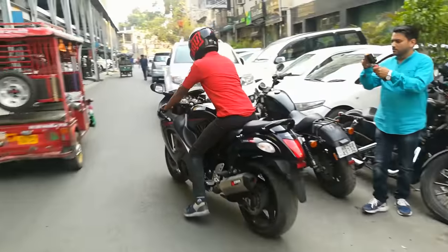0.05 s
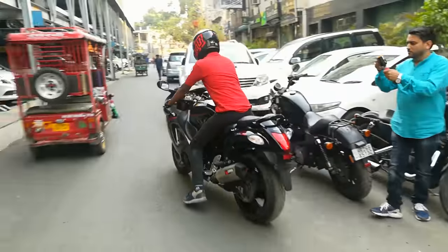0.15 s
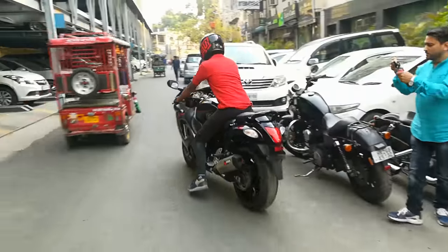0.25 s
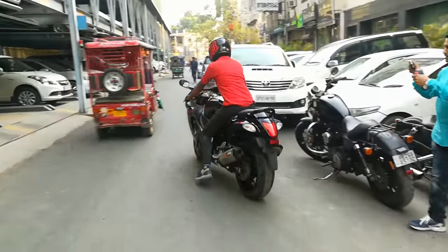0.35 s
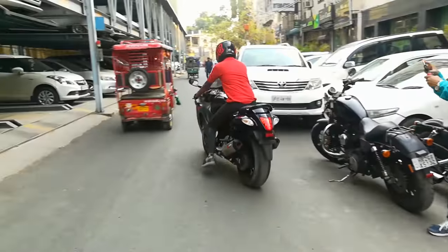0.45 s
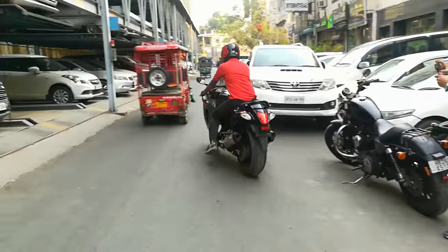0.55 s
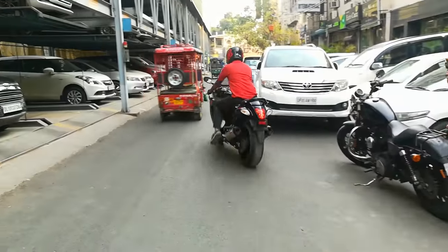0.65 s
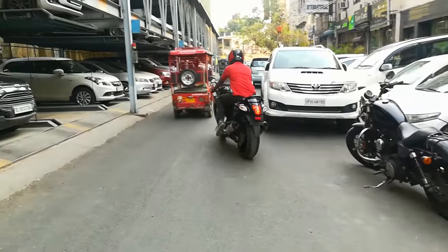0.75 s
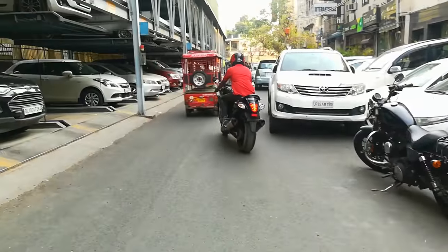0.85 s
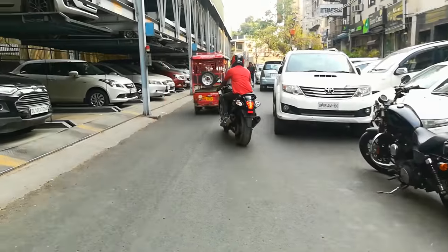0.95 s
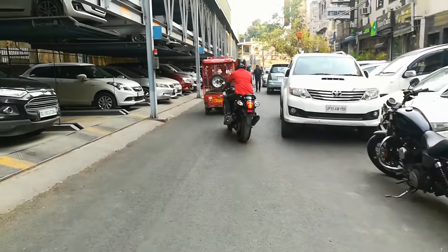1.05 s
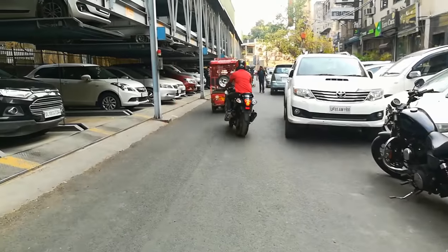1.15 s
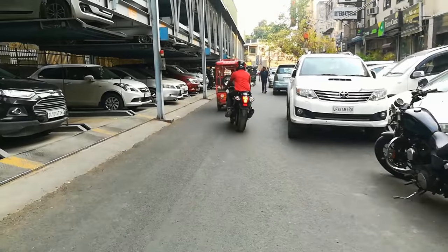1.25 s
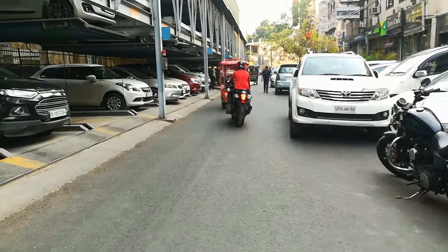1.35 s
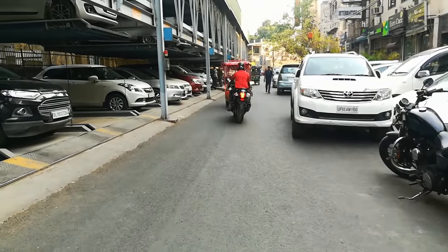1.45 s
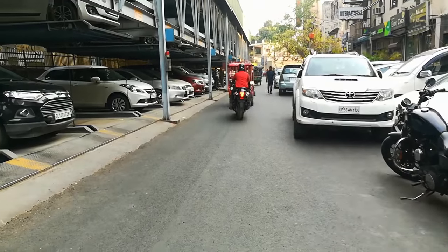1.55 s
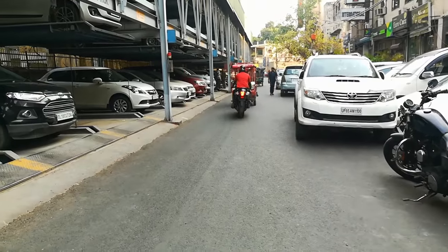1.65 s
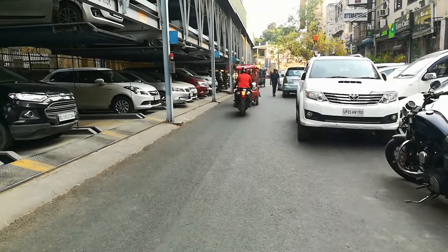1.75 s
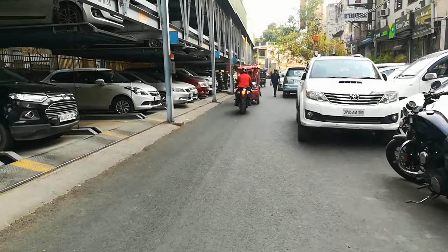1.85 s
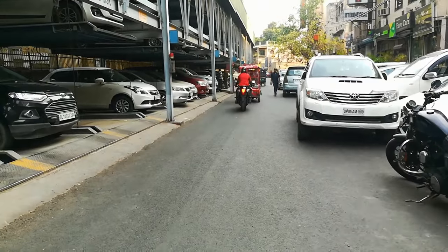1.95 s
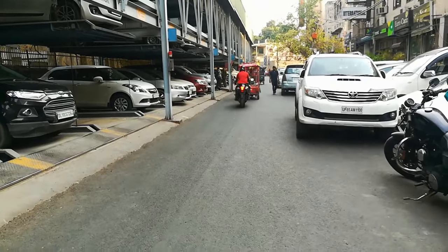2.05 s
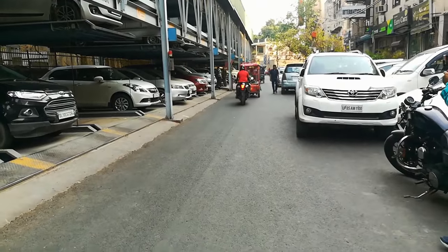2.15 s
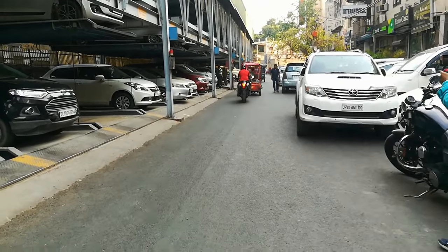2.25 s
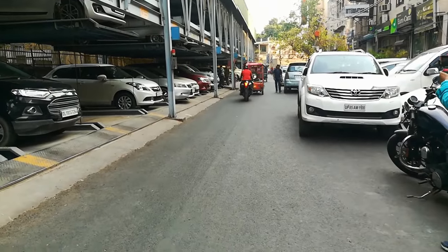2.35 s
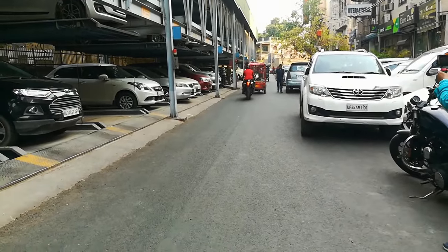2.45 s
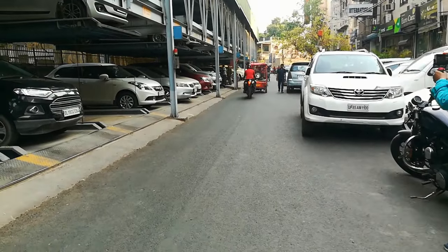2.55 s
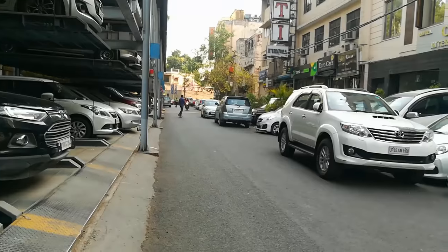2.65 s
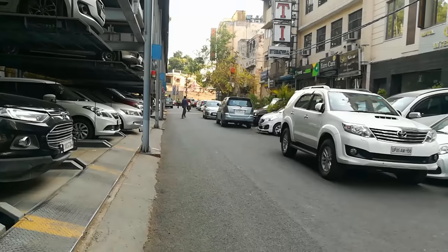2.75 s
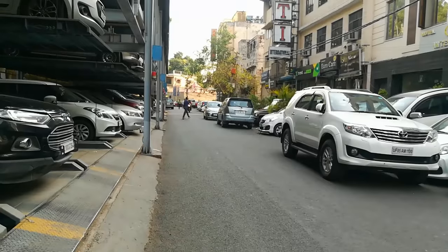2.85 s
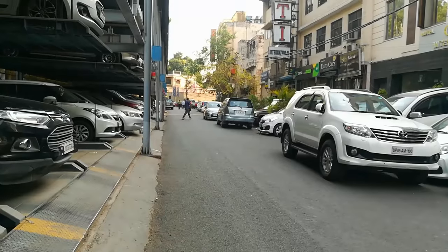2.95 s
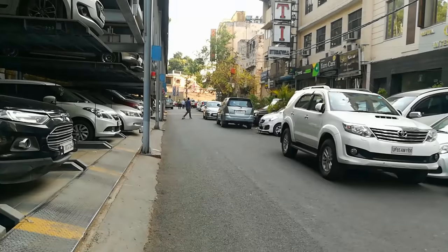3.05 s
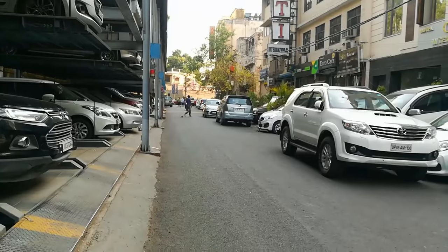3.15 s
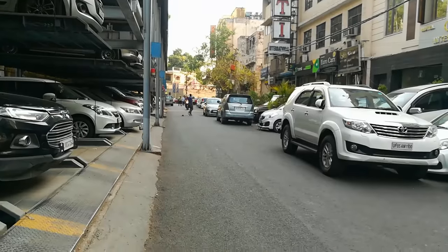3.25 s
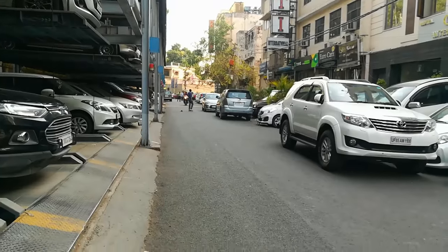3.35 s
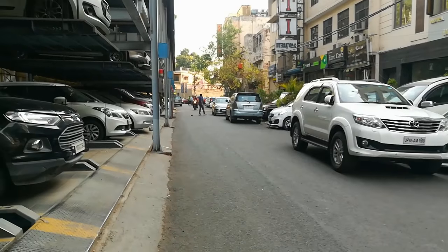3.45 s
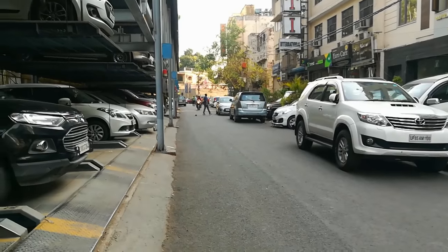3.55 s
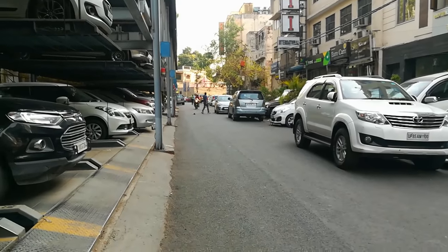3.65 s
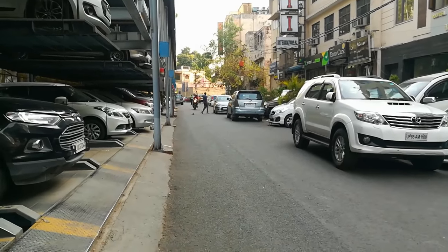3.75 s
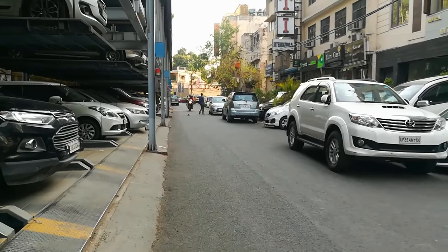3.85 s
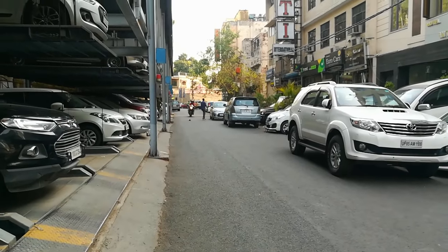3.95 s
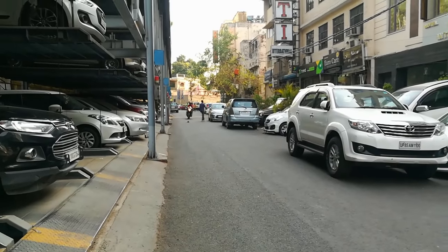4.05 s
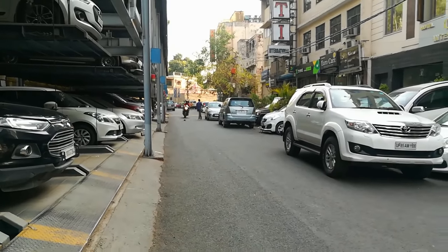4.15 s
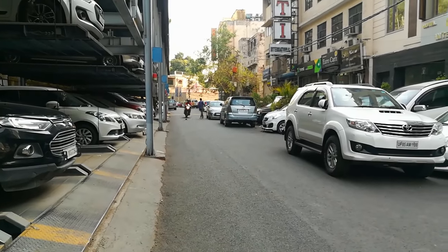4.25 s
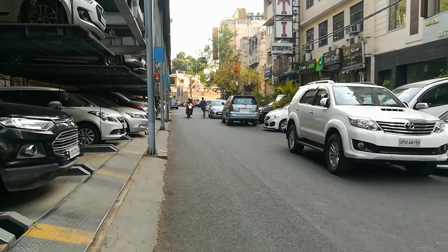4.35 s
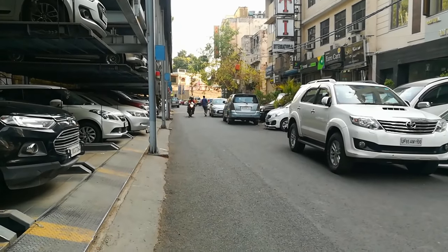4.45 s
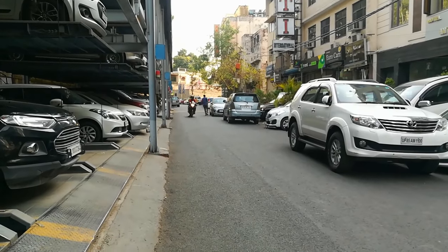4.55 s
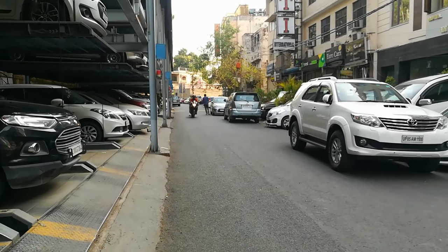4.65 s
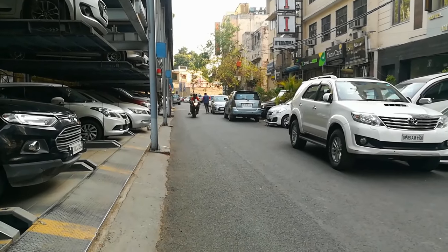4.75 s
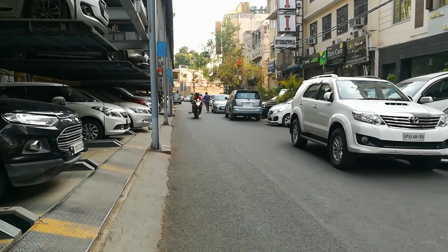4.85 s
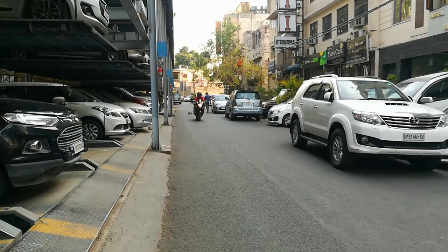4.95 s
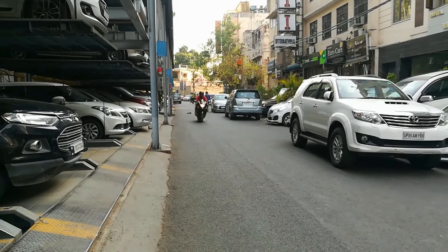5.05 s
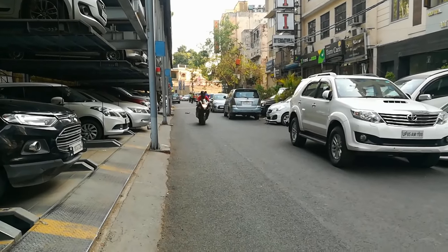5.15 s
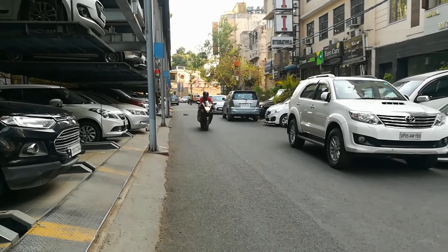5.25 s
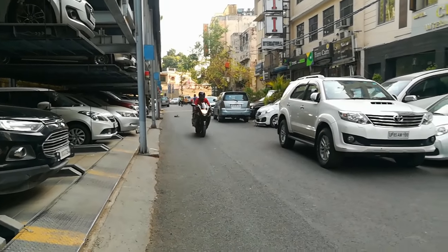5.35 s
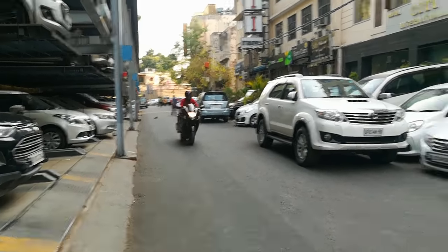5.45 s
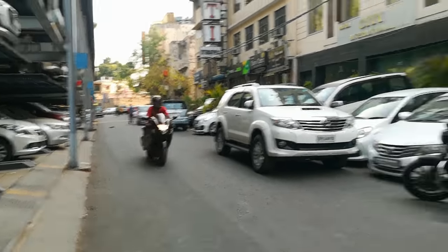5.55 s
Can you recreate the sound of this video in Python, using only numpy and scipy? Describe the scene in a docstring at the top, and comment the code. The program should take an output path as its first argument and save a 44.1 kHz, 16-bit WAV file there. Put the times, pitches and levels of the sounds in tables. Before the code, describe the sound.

A big motorcycle pulls gently away down a street, burbling and popping off throttle, then abruptly another pass accelerates hard back towards the listener.

```python
"""A motorcycle leaves down a narrow street and rides back

From 3.7 m off, a big four-cylinder machine pulls gently away and burbles and pops on a closed throttle.
The scene changes abruptly: it accelerates back from 46 m, shifts up once and shuts off some 15 m away.
Exhaust orders are sines locked to the firing phase; delayed street reflections make them swell and fade.
Filtered noise makes clatter, hiss, intake, ringing bands, scuffs and street; wavering sines make gear whine.
"""
import sys
import numpy as np
from scipy import signal
from scipy.fft import rfft, irfft, next_fast_len
from scipy.io import wavfile
from scipy.ndimage import uniform_filter1d, map_coordinates

SR = 44100
rng = np.random.default_rng(int(sys.argv[2]) if len(sys.argv) > 2 else 0)


def put_to_file(sound):
    """Save the sound as 16-bit audio at rate SR, in the file named by the first command-line argument."""
    columns = np.atleast_2d(sound).T  # one column per channel
    safe = np.clip(columns, -1, 1)
    whole_steps = np.round(safe * 32767)
    wavfile.write(sys.argv[1], SR, whole_steps.astype(np.int16))


N = 247842
T = np.arange(N) / SR  # time [s]
CUT_S = 2.557  # the ride away gives way to the ride back


def undb(db):
    """Decibels to gain."""
    return 10 ** (np.asarray(db) / 20)


def unit(x):
    """Scale to rms 1."""
    return x / np.sqrt(np.mean(x ** 2))


def curves(table):
    """Each column of a table as a line through time."""
    s, *columns = np.transpose(table)
    return [np.interp(T, s, c) for c in columns]


def gain_at(points, hz):
    """Gain of a spectrum at the given frequencies."""
    f, db = np.transpose(points)
    return undb(np.interp(np.log(hz + 1), np.log(f), db))


def colour(x, points):
    """Causal filter with the given spectrum, by way of the cepstrum."""
    size = 2 * next_fast_len(N)
    bins_hz = np.arange(size // 2 + 1) * SR / size
    cepstrum = irfft(np.log(gain_at(points, bins_hz)))
    # folding the cepstrum forward in time gives minimum phase
    cepstrum[1:size // 2] *= 2
    cepstrum[size // 2 + 1:] = 0
    response = np.exp(rfft(cepstrum))
    return irfft(rfft(x, size) * response)[..., :N]


def band(x, lo_hz, hi_hz, order=2):
    """Band-pass."""
    edges = [lo_hz, min(hi_hz, SR / 2 - 1)]
    return signal.sosfilt(signal.butter(order, edges, "band", fs=SR, output="sos"), x)


def walk(rate):
    """Random levels held 1 / rate s and smoothed twice; rms 1."""
    k = int(SR / rate)
    held = np.repeat(rng.standard_normal(N // k + 1), k)
    smooth = uniform_filter1d(uniform_filter1d(held, k), k)
    return unit(smooth[:N])


def air(shared):
    """White noise at two microphone ports, with a part common to both."""
    return unit(rng.standard_normal((2, N)) + shared * rng.standard_normal(N))


def resonances(modes):
    """Noise narrowed to a few bands, each at its own level."""
    return sum(undb(db) * unit(band(air(0.91), f - w / 2, f + w / 2, order=1)) for f, w, db in modes)


def levels(laws, *controls):
    """Each layer's level in dB: a base plus its own response to each control."""
    return {name: db + sum(slope * c for slope, c in zip(slopes, controls))
            for name, (db, *slopes) in laws.items()}


# Air of the street during the ride away: (frequency [Hz], relative level [dB])
STREET_SPECTRUM = [(240, -51), (400, -7), (520, -14), (653, -9.5), (1030, -10), (1170, -22), (1280, -7),
                   (1680, -16), (2880, -13.5), (3560, -22), (9930, -30), (15500, -38)]


def street_air():
    """Quiet street background: steady coloured noise with a slight waver."""
    return unit(colour(air(0.21), STREET_SPECTRUM)) * undb(-54.5 + 0.14 * walk(4.706))


# Distant traffic during the ride back: (frequency [Hz], relative level [dB])
TRAFFIC_SPECTRUM = [(25, 14.5), (65, 25.5), (150, 7), (310, 10.5), (430, -14), (530, -16), (950, 0.5),
                    (1350, 2), (1800, -12), (2800, -14), (5500, -14.5), (15000, -26)]


def distant_traffic():
    """Traffic far off: low-heavy noise, largely alike at both ports, slowly wavering."""
    return unit(colour(air(2.8), TRAFFIC_SPECTRUM)) * undb(-39 + 1.25 * walk(6.02))


# Small scuffs near the microphone: (time [s], half-width to 1/e [s], level [dB])
SCUFF_TIMES = [(3.27, 0.017, -55.5), (3.313, 0.0026, -48), (3.33, .018, -53)]
# Their tone: (frequency [Hz], relative level [dB])
SCUFF_SPECTRUM = [(2000, -34), (5000, -2.5), (11000, -4), (15000, -4.5)]


def scuffs():
    """Brief bright rubs close to the microphone: noise under bell-shaped swells."""
    swell = sum(undb(db) * np.exp(-((T - s) / length) ** 2) for s, length, db in SCUFF_TIMES)
    return swell * unit(colour(air(.3), SCUFF_SPECTRUM))


def street_echo(x, t60_s, wet_db):
    """Diffuse return from house fronts and the parking deck, different at each port."""
    t = T[:SR]
    after_gap = t > .012  # s before the first return
    tail = rng.standard_normal((2, SR)) * undb(-60 * t / t60_s) * after_gap
    tail /= np.sqrt(np.sum(tail ** 2, axis=1, keepdims=True))
    wet = signal.fftconvolve(x[None], tail, axes=1)[:, :N]
    # the ports lie close together, so they differ little in the bass
    return x + undb(wet_db) * colour(wet, [(60, -15.5), (170, -15.5), (330, 2.0), (500, 6)])


def mirrored(x, mirrors, since):
    """Late copies cancel and reinforce the direct sound, so a gliding tone swells and fades."""
    def late(ms):
        return map_coordinates(x, [(T - ms / 1000) * SR], order=1, mode="mirror")

    return x + sum(undb(db) * late(ms + drift * since) for ms, drift, db in mirrors)


def machinery(turn, spectrum, clatter_db, hiss_db, throb):
    """Valve gear, chain and tyres: a rush that throbs a little with each firing and flickers."""
    gate = (1 + throb * np.cos(2 * np.pi * turn)) * undb(0.35 * walk(90))
    clatter = unit(band(colour(air(0.32) * gate, spectrum), 457, 3380, order=4))
    hiss = unit(band(colour(air(0.089) * gate, spectrum), 3100, 15400, order=4))
    return clatter * undb(clatter_db + 1.2 * walk(18)) + hiss * undb(hiss_db + 0.39 * walk(15))


def whine(turn, gears, level_db, smear_rate):
    """Meshing gear teeth, smeared by backlash and by reflections on the way to each port."""
    def smeared(angle):
        return walk(smear_rate) * np.cos(angle) + walk(smear_rate) * np.sin(angle)

    out = np.zeros((2, N))
    for multiple, db in gears:
        angle = 2 * np.pi * multiple * turn
        out += undb(db) * np.array([smeared(angle) for _ in range(2)])
    return out * undb(level_db)


# Airbox resonances: (frequency [Hz], width [Hz], level against the intake level [dB])
AIRBOX_MODES = [(803, 69, -8.5), (1403, 87, -8.5), (1770, 270, -5)]


def intake_roar(turn, level_db):
    """Turbulence rings the airbox and gulps with one intake stroke per firing."""
    gulps = 1 + 0.21 * np.cos(2 * np.pi * turn)
    return resonances(AIRBOX_MODES) * gulps * undb(level_db)


# Narrow ringing bands of noise: engine covers, and a high microphone resonance near 10.4 kHz:
# (frequency [Hz], width [Hz], level against the hiss before dulling [dB])
RINGING_MODES = [(3025, 53, -3), (4030, 270, -5), (5449, 360, -11), (10420, 597, -14.5)]


def ringing_bands(near, hiss_db):
    """Engine covers and a high microphone resonance as bands of noise, all dropping near the end."""
    late_drop = np.interp(T, [5.33, 5.46], [1, .4])
    return resonances(RINGING_MODES) * near * late_drop * undb(hiss_db)


def uneven_firings(turn):
    """One pulse per firing, of random size and either sign, for the unevenness of the burns."""
    at = np.flatnonzero(np.diff(np.floor(turn)))
    pulses = np.zeros(N)
    pulses[at] = rng.uniform(-0.79, 1, len(at))
    return pulses


# Pops in the silencer: (time [s], peak level before the common pop gain [dB])
SILENCER_POPS = [(1.774, -37), (1.87, -38), (2.042, -42), (2.075, -40.5), (2.33, -45), (2.367, -40),
                 (2.52, -37)]
# Tone of a pop: (frequency [Hz], relative level [dB])
POP_SPECTRUM = [(30, -18), (90, 26), (200, 21), (350, -4), (480, -26), (1000, -34), (4000, -51)]
# Tone of the burble: (frequency [Hz], relative level [dB])
BURBLE_SPECTRUM = [(20, -52), (45, 1.5), (75, 1.5), (115, 4.5), (170, -9.5), (240, -21.5), (360, -16.5),
                   (520, -49), (1500, -80)]
POP_GAIN_DB = 11.5


def overrun(turn, burble_db):
    """With the throttle shut the cylinders fire raggedly and stray fuel pops in the silencer."""
    ragged_turn = turn + 0.193 * walk(60)
    burble = unit(colour(uneven_firings(ragged_turn), BURBLE_SPECTRUM)) * undb(burble_db)
    kicks = np.zeros(N)
    for s, db in SILENCER_POPS:
        kicks[int(s * SR)] += undb(db)
    ring_peak = np.abs(colour(signal.unit_impulse(N), POP_SPECTRUM)).max()
    return burble + undb(POP_GAIN_DB) * colour(kicks, POP_SPECTRUM) / ring_peak


def exhaust(turn, hz, order_db, spectrum, rasp_db, upper_db, half_db, rough_db, gas, count=9):
    """Low orders, one by one, and the rasp: whole orders from the mean firing, half orders from
    unequal cylinders, and a rumble from uneven burns and gas flow in the silencer."""
    angle = 2 * np.pi * (turn + .006 * walk(45))  # slight jitter of the firing

    def order(k):
        """One multiple of the firing rate; the sharp edge leaves first, the low boom after it."""
        return np.cos(k * angle + np.pi * k ** 2 / 7)

    def line(k):
        """An order at the silencer's gain, wavering on its own."""
        return gain_at(spectrum, k * hz) * undb(1.87 * walk(13)) * order(k)

    boom = [undb(db + 0.6 * k * walk(11)) * np.sqrt(2) * order(k) for k, db in enumerate(order_db, 1)]
    whole = sum(line(k) for k in range(len(order_db) + 1, count + 1))
    halves = sum(line(k + .5) for k in range(1, count - 2))
    flow = rng.standard_normal(N) * (1 + 0.45 * np.cos(angle))
    burns = unit(uneven_firings(turn) / np.sqrt(hz))
    rough = unit(colour(burns + gas * flow, spectrum))
    rasp = undb(upper_db) * whole + undb(half_db) * halves + undb(rough_db) * rough
    return boom, undb(rasp_db) * rasp


# Engine speed riding away: (time [s], firing rate [Hz])
AWAY_FIRING = [(0.0, 73.2), (0.38, 59.47), (0.6, 64.6), (0.97, 61.47), (1.29, 70.64), (1.5, 74.86),
               (1.63, 72.7), (1.72, 66.2), (1.79, 71.43), (2.55, 61.8)]
# Level by layer, before wavering: (at the start with the throttle shut [dB],
# change per halving of distance [dB], added by the throttle [dB])
AWAY_LAYERS = {"first order": (-23, 8.1, 2.3), "second order": (-35.5, 4.35, 12.63),
               "third order": (-43, 1, 10.9), "rasp": (-53.5, 0, 19.1), "clatter": (-51.5, 3.5, 5.7),
               "hiss": (-57, 2.4, 6.54), "gears": (-55, 8.7, 7.5)}
# The silencer heard from behind: (frequency [Hz], relative level [dB])
SILENCER_BEHIND = [(25, -5), (55, -8), (100, -0.5), (160, 7.5), (200, -2), (250, 3.5), (320, -6),
                   (385, -13), (460, -15.5), (540, -31), (900, -36), (2000, -43)]
# House fronts and parked cars mirroring the boom:
# (delay as the ride begins [ms], drift [ms per s], level [dB])
AWAY_REFLECTORS = [(38.03, 0.73, -11), (48.54, -2, -12.5)]
# Tone of clatter and hiss: (frequency [Hz], relative level [dB])
AWAY_RUSH = [(320, -17), (550, 1), (598, -25), (727, 5.5), (802, -4), (922, 2.5), (1340, -1.5), (1750, -1),
             (2250, -4), (3110, -12.5), (3380, -8.5), (3830, -13.5), (5000, -12), (11400, -21.5),
             (15500, -33)]
# Gear whine: (multiple of the firing rate, level against the gear layer [dB])
AWAY_WHINE = [(25.8, -2.5), (52, -11.5)]
AWAY_START_M, AWAY_SPEED_M_S, AWAY_PICKUP_M_S2 = 3.7, 0.69, 5.6
SHUT_S, SHUT_TAKES_S = 1.53, 0.12  # the throttle closes
BURBLE_DB, BURBLE_FADE_DB_PER_S = -29.5, 12.5  # level at SHUT_S, and its fall


def riding_away():
    """The tailpipe faces the microphone; distance and throttle set each layer as the bike leaves."""
    hz, = curves(AWAY_FIRING)
    turn = np.cumsum(hz) / SR  # firings so far
    distance = AWAY_START_M + AWAY_SPEED_M_S * T + AWAY_PICKUP_M_S2 * T ** 2 / 2
    shut = np.clip((T - SHUT_S) / SHUT_TAKES_S, 0, 1)
    db = levels(AWAY_LAYERS, np.log2(AWAY_START_M / distance), 1 - shut)
    order_db = db["first order"], db["second order"], db["third order"]
    boom, rasp = exhaust(turn, hz, order_db, SILENCER_BEHIND, db["rasp"],
                         upper_db=-1.2, half_db=-13.5, rough_db=-5, gas=1.5)
    burble = shut * overrun(turn, BURBLE_DB - BURBLE_FADE_DB_PER_S * (T - SHUT_S))
    pipe = mirrored(sum(boom), AWAY_REFLECTORS, T) + rasp + burble
    rush = machinery(turn, AWAY_RUSH, db["clatter"], db["hiss"], throb=0.065)
    gears = whine(turn, AWAY_WHINE, db["gears"], smear_rate=90)
    return street_echo(pipe, t60_s=0.86, wet_db=-7.5) + rush + gears + street_air()


# Engine speed riding back, a long pull and one upshift: (time [s], firing rate [Hz])
BACK_FIRING = [(2.56, 64.07), (2.92, 75.07), (3.3, 87.28), (4.05, 127.9), (4.51, 168.3), (4.56, 171.3),
               (4.77, 194.2), (4.87, 214.9), (4.92, 209.9), (5.01, 180.4), (5.08, 152.9), (5.18, 153.5),
               (5.45, 169), (5.55, 153), (5.62, 143.2)]
# Throttle riding back: (time [s], opening [0-1])
BACK_OPENING = [(4.15, 0.39), (4.35, 0.66), (4.88, 0.94), (4.94, 0.54), (5.04, 0.55), (5.12, 0.71),
                (5.27, 0.9), (5.42, 1), (5.49, .05)]
# Level by layer, before wavering: (at the start, idling with the throttle shut [dB],
# change per halving of distance [dB], added by full throttle [dB], change per octave of revs [dB])
BACK_LAYERS = {"first order": (-29.5, 8, 8, 1.1), "second order": (-43, 6.5, 17, -0.5),
               "rasp": (-43.5, 8, 8, 3), "clatter": (-48, 7, 6.5, 1.5), "hiss": (-64, 12.5, 10.5, 1.78),
               "intake": (-61, 4.5, 13.5, 8)}
# The silencer heard from ahead: (frequency [Hz], relative level [dB])
SILENCER_AHEAD = [(25, -36), (55, -12), (95, 4), (170, 6), (260, 1.5), (335, -1), (400, -10), (500, -16),
                  (620, -23), (900, -29.5), (2000, -57)]
# House fronts and parked cars mirroring the boom:
# (delay as the ride begins [ms], drift [ms per s], level [dB])
BACK_REFLECTORS = [(15.85, 6.55, -8.8), (22.58, -7.0, -3.1), (25.12, 11.99, -15.8), (59.99, -14.78, -12.7),
                   (69.12, 5.04, -16.5), (89.14, -10.81, -12.3), (97.37, -19.85, -11.7)]
# Tone of clatter and hiss: (frequency [Hz], relative level [dB])
BACK_RUSH = [(350, -23), (580, 2), (820, 0), (1150, -1.5), (1450, -3.5), (1850, -5), (2600, -7.5),
             (3300, -7), (5400, -9), (6600, -13), (10500, -17.5), (15500, -26)]
# Treble lost over the length of the street: (frequency [Hz], gain [dB])
FAR_DULLING = [(5000, -4), (9000, -4.5), (14000, -10)]
# Gear whine: (multiple of the firing rate, level against the clatter at full throttle [dB])
BACK_WHINE = [(19.2, -19.5), (25.7, -13)]
BACK_START_M, BACK_SPEED_M_S = 46.3, 10.58
IDLE_HZ, UNDULLED_M = 65.6, 12.7
KNEE_HZ, KNEE_DB_PER_OCTAVE = 320, 32  # above this the silencer swallows the second order


def riding_back():
    """The bike pulls hard towards the microphone; distance, throttle and revs set each layer."""
    hz, = curves(BACK_FIRING)
    throttle = np.clip(curves(BACK_OPENING)[0], 0, 1)
    turn = np.cumsum(hz) / SR  # firings so far
    distance = np.maximum(BACK_START_M - BACK_SPEED_M_S * (T - CUT_S), 1)
    db = levels(BACK_LAYERS, np.log2(BACK_START_M / distance), throttle, np.log2(hz / IDLE_HZ))
    near = np.minimum(UNDULLED_M / distance, 1)  # share of the treble that arrives undulled
    swallowed_db = KNEE_DB_PER_OCTAVE * np.maximum(np.log2(2 * hz / KNEE_HZ), 0)
    order_db = db["first order"], db["second order"] - swallowed_db
    (boom, growl), rasp = exhaust(turn, hz, order_db, SILENCER_AHEAD, db["rasp"], upper_db=-3.0,
                                  half_db=-15 + 9.7 * throttle, rough_db=-0.5, gas=1.9)
    # from afar only the longest waves are mirrored whole
    pipe = mirrored(boom, BACK_REFLECTORS, T - CUT_S) + growl + rasp
    rush = machinery(turn, BACK_RUSH, db["clatter"], db["hiss"], throb=0.031)
    rush = near * rush + (1 - near) * colour(rush, FAR_DULLING)
    intake = intake_roar(turn, db["intake"])
    ringing = ringing_bands(near, db["hiss"])
    load = np.sqrt(throttle)  # teeth sing under load
    gears = load * whine(turn, BACK_WHINE, db["clatter"], smear_rate=330)
    echoing_pipe = street_echo(pipe, t60_s=0.22, wet_db=-5)
    return echoing_pipe + rush + intake + ringing + gears + distant_traffic()


def scene():
    """The ride away gives way abruptly to the ride back."""
    return np.where(T < CUT_S, riding_away(), riding_back()) + scuffs()


# Tilt between the two microphone ports, shared out unequally: (frequency [Hz], left over right [dB])
PORT_TILT = [(200, 0), (1200, 1), (2500, 0.5), (4800, 1.5), (8000, -6.5), (14000, -12.5)]
LEFT_SHARE, RIGHT_SHARE = 0.55, 0.4
TOP_HZ = 15500


def record(dry):
    """The right port has more top than the left; the microphone clips at full scale and cuts the top."""
    left = colour(dry[0], [(hz, db * LEFT_SHARE) for hz, db in PORT_TILT])
    right = colour(dry[1], [(hz, -db * RIGHT_SHARE) for hz, db in PORT_TILT])
    clipped = np.clip([left, right], -1, 1)
    top_cut = signal.ellip(10, .1, 80, TOP_HZ, fs=SR, output="sos")
    return signal.sosfilt(top_cut, clipped)


dry = scene()
out = record(dry)
put_to_file(out)
```